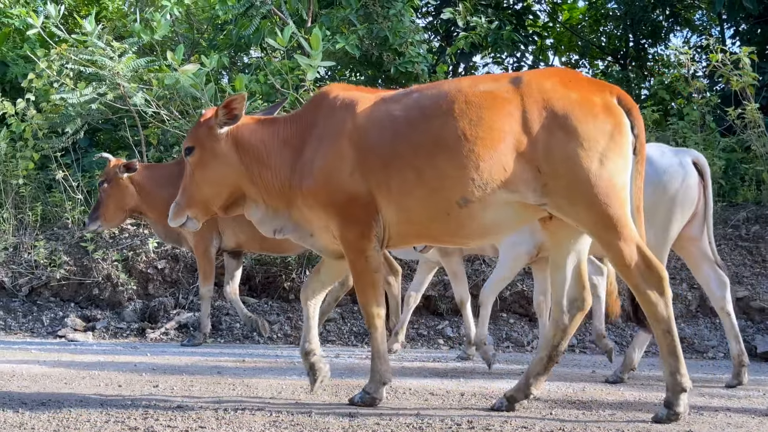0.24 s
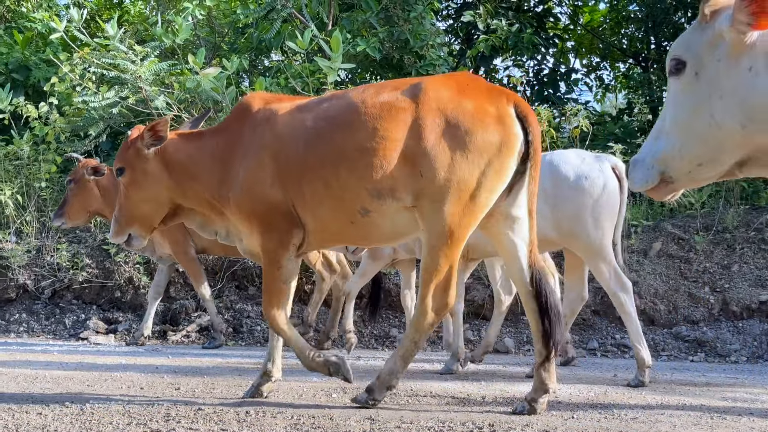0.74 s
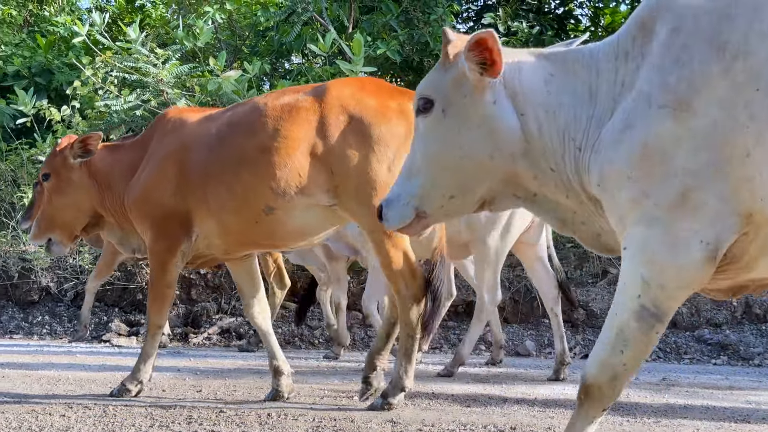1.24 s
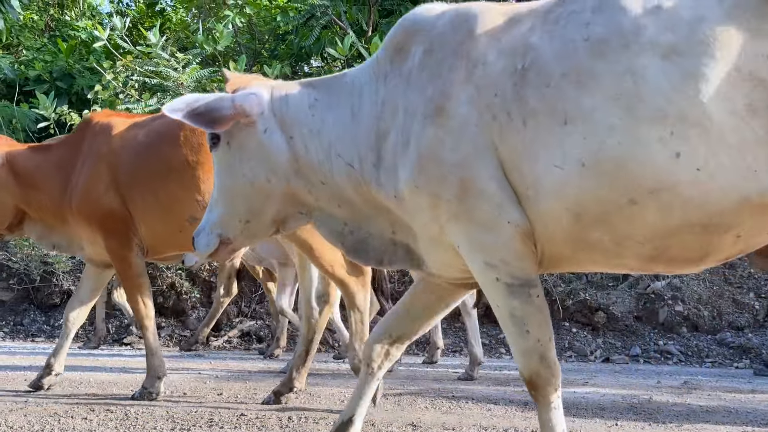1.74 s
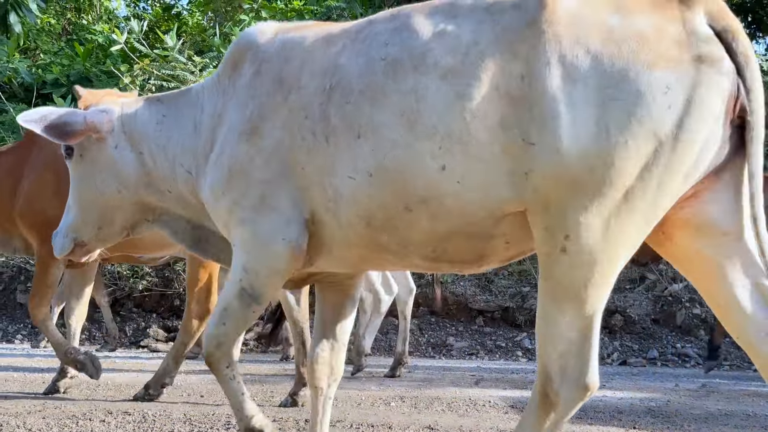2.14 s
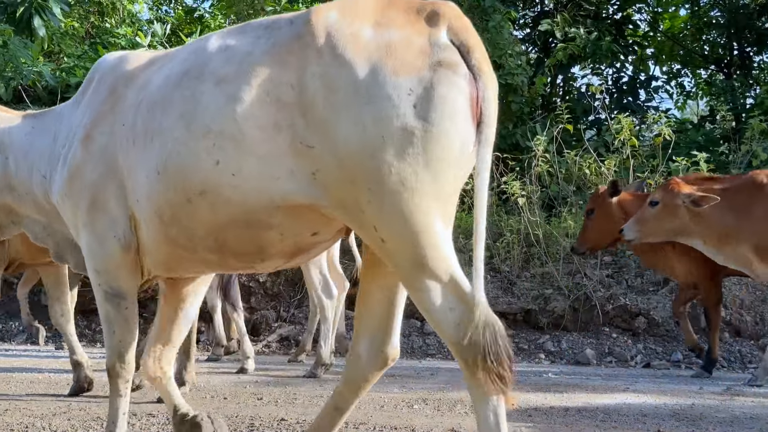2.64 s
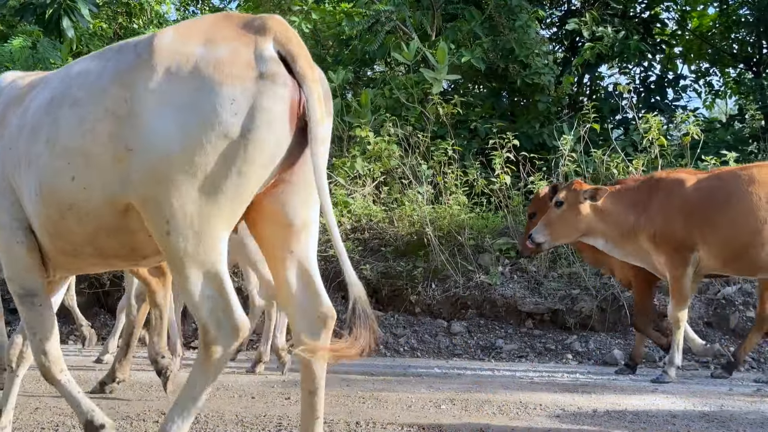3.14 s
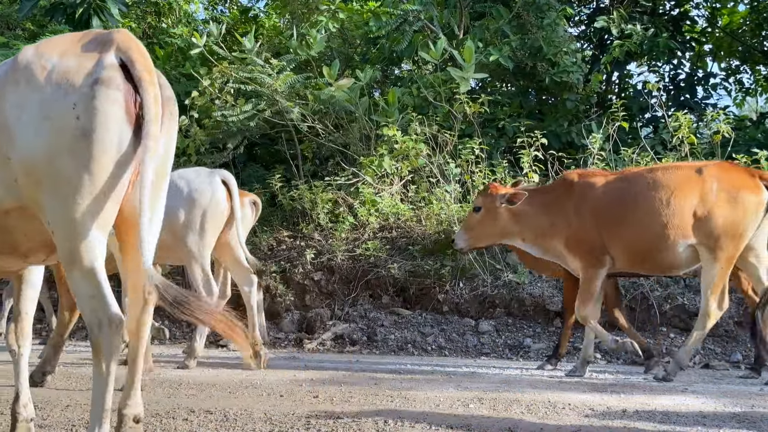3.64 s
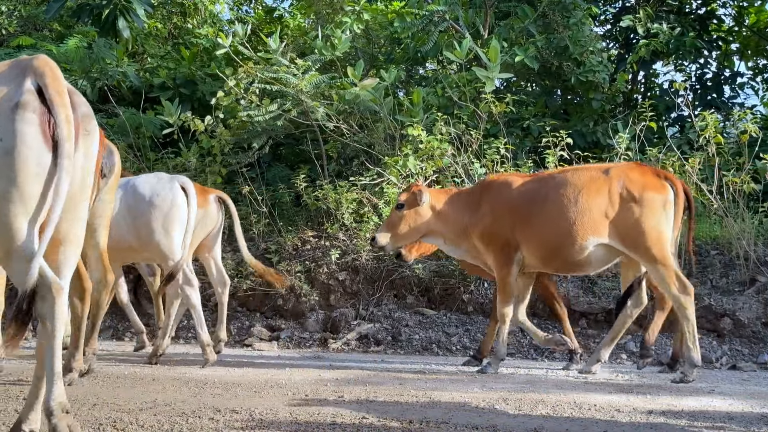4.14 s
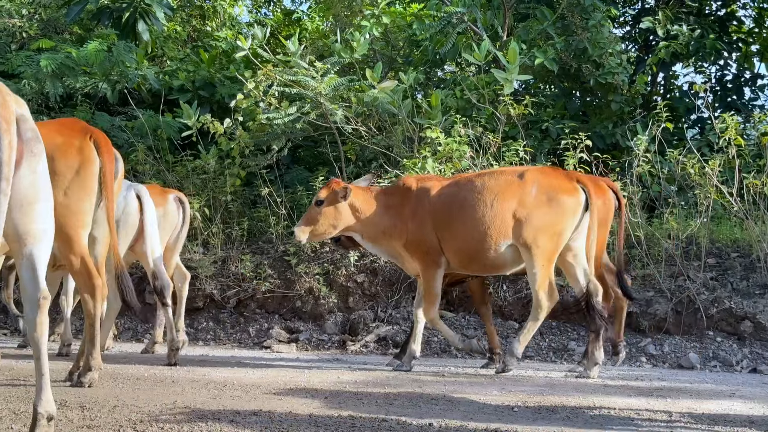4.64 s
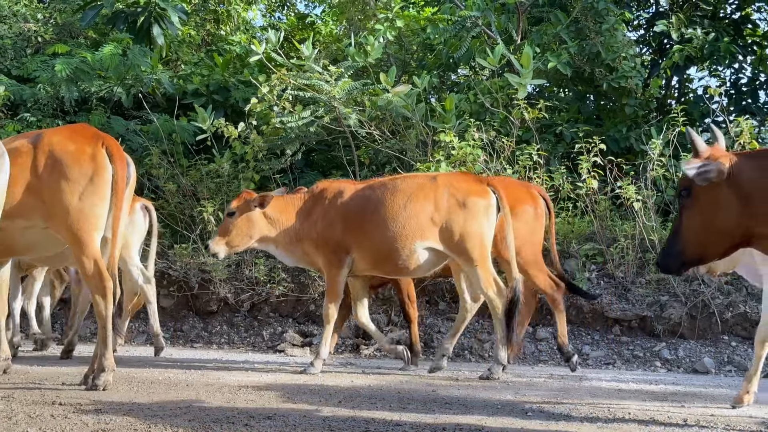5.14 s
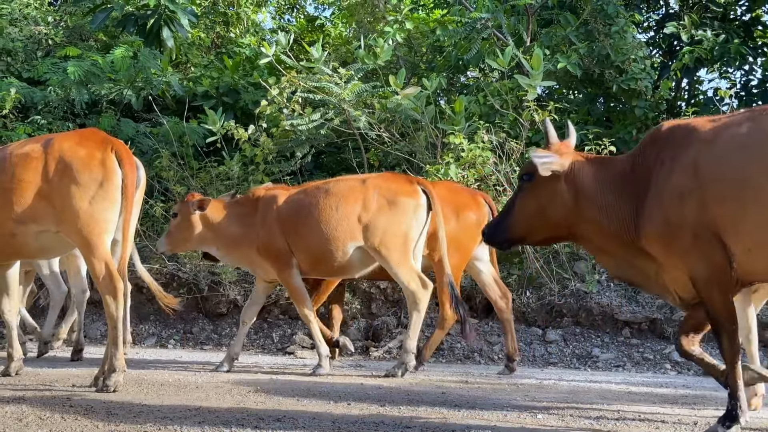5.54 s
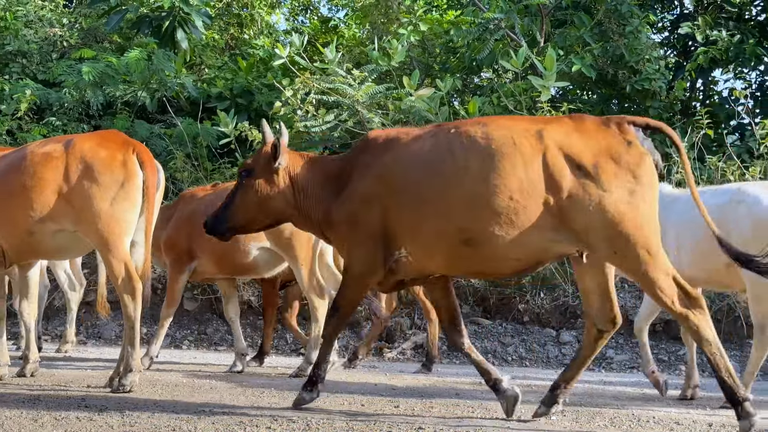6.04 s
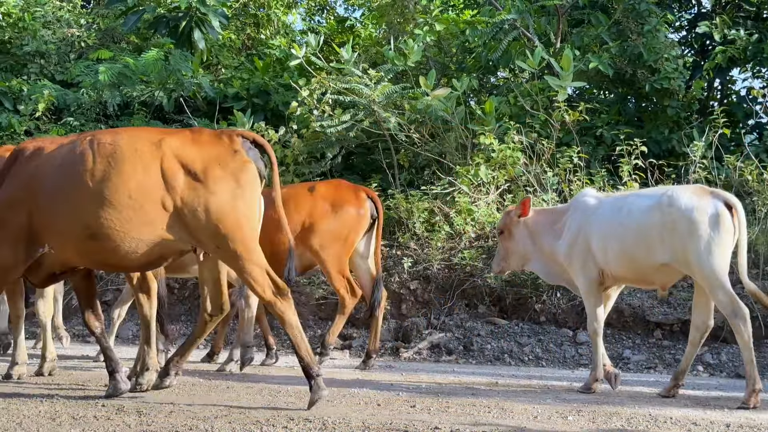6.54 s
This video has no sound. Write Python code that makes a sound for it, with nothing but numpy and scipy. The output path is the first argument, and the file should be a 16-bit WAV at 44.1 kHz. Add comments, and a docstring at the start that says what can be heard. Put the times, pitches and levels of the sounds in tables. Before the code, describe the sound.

Outdoors on a gravel road, a pair of close microphones hears hooves scuff and click quietly, then three cows low one after another near the right side. The first call swells loud and stops abruptly, the second is higher and softer, the third deep, rough and long. Wind buffets low, a brief rustle and thin insect tone slip between, over distant rumble and faint hiss.

```python
"""Three lowing calls on a gravel road

Three animals of a herd low in turn, close by on the right of a pair of microphones; each call rises, holds and falls.
Each closing of the vocal folds rings throat resonances that move with the mouth, mixed with a puff of breath.
Hooves click (short cracks of noise) and scuff (swells of uneven grains) on gravel, a noise band rustles,
an insect sings briefly in thin wavering tones, and lumpy low noise buffets the microphones over a far rumble and hiss."""
import sys
import numpy as np
from scipy import signal
from scipy.fft import rfft, irfft, next_fast_len
from scipy.io import wavfile
from scipy.ndimage import uniform_filter1d, map_coordinates

SR = 44100
rng = np.random.default_rng(int(sys.argv[2]) if len(sys.argv) > 2 else 0)


def wrap_up_sound(samples):
    """Save the sound to the file named by the first command line argument, as 16-bit audio."""
    columns = np.atleast_2d(samples).T
    # keep every value between -1 and 1, then stretch to whole-number steps
    tamed = np.clip(columns, -1, 1)
    steps = np.round(tamed * 32767).astype(np.int16)
    wavfile.write(sys.argv[1], SR, steps)


N = 299439
SPAN = 4096  # samples that each vocal pulse may ring


def amp(db):
    """Gain of a level in dB."""
    return 10 ** (np.asarray(db) / 20)


def unit(x):
    """x at rms 1."""
    return x / np.sqrt(np.mean(x ** 2) + 1e-20)


def along(points, hz):
    """A (f/Hz, value) table read at hz on a log frequency axis."""
    f, v = np.transpose(points)
    return np.interp(np.log(hz + 1), np.log(f + 1), v)


def curve(rows, x=None):
    """A (position, value) table read at x, or at the time of every sample."""
    return np.interp(np.arange(N) / SR if x is None else x, *np.transpose(rows))


def wobble(rate):
    """A smooth random curve, rate knots a second."""
    knots = rng.standard_normal(int(N * rate / SR) + 4)
    return map_coordinates(knots, [np.arange(N) * rate / SR])


def filtered(x, response):
    """x times a response of frequency."""
    m = next_fast_len(N + SR // 2)
    return irfft(rfft(x, m) * response(np.fft.rfftfreq(m, 1 / SR)), m)[..., :N]


def rush(spectrum, source=None):
    """Stereo noise of rms 1, partly shared by the two microphones as from a spread-out source."""
    # left-right likeness: f/Hz, correlation
    alike = [(40, 0.929), (130, 0.885), (640, 0.77), (3100, 0.92), (15000, 0.18)]
    pair = rng.standard_normal((2, N)) if source is None else source

    def mid_side(hz):
        turn = np.arccos(np.clip(along(alike, hz), -1, 1)) / 2
        return amp(along(spectrum, hz)) * [np.cos(turn), np.sin(turn)]

    mid, side = filtered(pair, mid_side)
    return unit(np.array([mid + side, mid - side]))


def far_air():
    """A steady far rumble and a hiss, both shaped noise."""
    # spectra of the rumble and the hiss: f/Hz, relative level/dB
    rumble = [(13, -40.5), (24, -16.5), (53, -0.5), (71, -23.5), (187, -15), (214, -25), (372, -32),
              (486, -30), (1200, -43.5), (1560, -70.5), (2640, -120)]
    hiss = [(410, -40.5), (700, -9.5), (1290, -12), (7120, -15), (8540, -16.5), (12600, -8), (15500, -19.5)]
    rumble_db, hiss_db = -64, -84
    return amp(rumble_db) * rush(rumble) + amp(hiss_db) * rush(hiss)


def buffeting():
    """Air pushing at the microphones is low noise in lumps, with stronger spells that rise and sink."""
    # course of the buffeting before its lumps: t/s, level/dB
    course = [(0, -68), (1.9, -69.5), (2.2, -63.5), (4.5, -63), (4.8, -65.5), (6.79, -63)]
    # stronger spells before the lumps: peak t/s, level/dB, time to rise 20 dB/s
    spells = [(2.4, -44, 0.29), (3.3, -60.5, 0.5), (3.57, -45, 0.2258), (5.199, -64, 1.12),
              (5.501, -37.5, 0.1115)]
    # spectrum of the buffeting: f/Hz, relative level/dB
    gust_spectrum = [(25, -49), (40, -9), (60, -0.5), (110, -4), (200, -14.5), (400, -22.5), (800, -48.5),
                     (1600, -120)]
    fall_s = 0.25  # time to sink 20 dB
    t = np.arange(N) / SR
    gusts = sum(amp(db - 20 * np.maximum((s - t) / rise, (t - s) / fall_s)) for s, db, rise in spells)
    lumps = amp(3.6 * wobble(14))
    return (amp(curve(course)) + gusts) * lumps * rush(gust_spectrum)


def air_puffs():
    """A single puff of air swings both microphones alike, a few low cycles that soon die."""
    # puffs: start t/s, level before an 11 dB lift and the swing's envelope/dB, f/Hz
    thumps = [(2.529, -29.5, 115.6), (3.229, -27.5, 59.52), (3.254, -24.5, 58), (3.476, -32.5, 129.9),
              (3.486, -31.5, 80), (3.494, -30, 75.4), (3.513, -34, 80)]
    out = np.zeros((2, N))
    for s, db, hz in thumps:
        cycles = np.arange(SR // 10) / SR * hz
        swing = np.sin(2 * np.pi * cycles) * cycles * np.exp(-1.8 * cycles)
        first = round(s * SR)
        out[:, first:first + len(cycles)] -= amp(db + 11.0) * swing
    return out


def far_gravel():
    """Gravel under the whole herd is noise with a slow and a quick flutter."""
    # course before the flutter: t/s, level/dB
    course = [(0, -86.5), (1.9, -81), (2.9, -71.5), (4.6, -71), (5.4, -71), (6.5, -65.5), (6.79, -71.5)]
    # spectrum of the gravel: f/Hz, relative level/dB
    gravel = [(410, -42), (700, -4), (1700, -8), (4200, -7.5), (7400, -9), (10000, -15.5), (13000, -22.5),
              (15500, -32)]
    return amp(curve(course) + 2.1 * wobble(18) + 0.92 * wobble(300)) * rush(gravel)


def near_scuffs():
    """A hoof dragged through gravel is a swell of many grains of uneven size."""
    # drags: start t/s, level before a 4 dB cut and the swell's shape/dB
    drags = [(0.047, -59.5), (0.24, -56), (0.507, -58), (0.569, -54.5), (0.784, -53.5), (0.847, -56),
             (1.114, -56), (1.198, -57), (1.333, -45.5), (1.458, -50.5), (1.555, -61), (1.68, -56),
             (1.917, -51.5), (3.98, -43), (4.8933, -52), (5.6375, -34), (5.715, -42), (6.0552, -41.5)]
    # spectrum of a near scuff: f/Hz, relative level/dB
    grit = [(410, -42.5), (900, -18.5), (2000, -6.5), (4200, -9), (7400, -6), (10000, -9.5), (13000, -21),
            (15500, -24.5)]
    swell_s = 0.05  # time scale of one drag
    swells = 0
    for s, db in drags:
        u = np.maximum(np.arange(N) / SR - s, 0) / swell_s
        swells = swells + amp(db - 4.0) * u * np.exp(-3 * u ** 2)
    grains = rng.standard_normal((2, N)) * amp(1.5 * wobble(40) + 4 * wobble(500))
    return swells * rush(grit, grains)


def hoof_clicks():
    """A hoof striking stone is a decaying crack of noise in the stone's colour, plus its bright edge."""
    # strikes: t/s, level before a 9 dB lift and the stone's colour/dB, gain of the bright edge/dB
    strikes = [(0.637, -68.5, -9), (0.6825, -57, -30.5), (0.708, -54, -22), (0.7285, -59, -29.5),
               (1.3512, -64.5, -24), (1.53, -58, -17.5), (1.614, -58, -35), (1.66, -58.5, -34),
               (1.7453, -43.5, -35), (1.7757, -54.5, -27.5), (1.8334, -55, -26), (2.98, -54.5, -17),
               (3.2182, -62, -5.5), (3.297, -57.5, -15), (3.456, -52.5, -15.5), (4.7300, -48, -26.5)]
    # colour of the stone: f/Hz, level/dB (held at -40 dB or above)
    stone = [(290, -61), (500, -57), (2070, 1.5), (3240, -10), (4190, -4.5), (5670, -19.5), (9790, -15),
             (15500, -38)]
    t = np.arange(1000) / SR
    cracks, sparks = np.zeros((2, N))
    for s, db, treble_db in strikes:
        crack = amp(db + 9.0 - 60 * t / 0.012) * rng.standard_normal(len(t))  # 60 dB down in 12 ms
        first = round(s * SR)
        cracks[first:first + len(t)] += crack
        edge = crack[2:] - crack[:-2]  # a difference two samples apart
        sparks[first + 2:first + len(t)] += amp(treble_db) * edge
    grid = np.linspace(0, 1, 128)
    colour_db = np.maximum(along(stone, grid * SR / 2), -40)
    # twice the dB, since the minimum-phase step takes the square root of the response
    colour = signal.minimum_phase(signal.firwin2(255, grid, amp(2 * colour_db)))
    return signal.lfilter(colour, 1, cracks) + sparks


def rustle():
    """Short bursts of noise in one broad band, sudden to start, slower to sink."""
    # bursts: start t/s, level before the flutter/dB, time to sink 10 dB/s
    bursts = [(4.726, -41, 0.0408), (5.24, -64, 0.02), (5.343, -59.5, 0.22), (5.47, -56.5, 0.42)]
    centre_hz, wide_hz = 4650, 1600
    t = np.arange(N) / SR
    level = 0
    for s, db, fall in bursts:
        onset = np.clip((t - s) / 0.0059, 0, 1)
        level = level + amp(db - 10 * np.maximum(t - s, 0) / fall) * onset
    noise = rng.standard_normal((2, N))
    band = filtered(noise, lambda f: np.exp(-((f - centre_hz) / wide_hz) ** 2))
    return level * amp(2.0 * wobble(150)) * unit(band)


def insects():
    """Thin tones of unsteady pitch that fade in and out."""
    # songs: start t/s, end t/s, f/Hz, waver/Hz, rms level between the fades/dB
    songs = [(1.656, 1.937, 3348, 6, -82), (4.321, 4.566, 6780, 230, -68.5)]
    out = 0
    for s0, s1, hz, width, db in songs:
        phase = 2 * np.pi * np.cumsum(hz + width * wobble(600)) / SR
        fade = curve([(s0, 0), (s0 + 0.036, 1), (s1 - .02, 1), (s1, 0)])
        out = out + amp(db) * fade * np.sqrt(2) * np.sin(phase)
    return out


def roughness(at, pitch, clean, slack):
    """Slack folds run rougher with the square of the drop under the top pitch, and in hoarse spells."""
    # spells where the voice breaks up: start t/s, end t/s, added roughness,
    # level that every other pulse gains and the next loses/dB
    hoarse = [(3.2, 3.5, .6, 0), (3.57, 3.77, .14, 0), (4.33, 4.66, .15, 0), (5.38, 5.58, .15, 2.5),
              (5.62, 5.98, .33, 1), (5.95, 6.7, .05, .7)]
    fade_s = .06
    spells, uneven_db = sum(
        np.outer(added, np.clip(np.minimum(at - s0, s1 - at) / fade_s, 0, 1)) for s0, s1, *added in hoarse)
    rough = clean + slack * (1 - pitch / pitch.max()) ** 2 + spells
    return np.clip(rough, 0, 1), uneven_db


def throat_ring(f, at, rough, shape, tongue, throat, nose):
    """Resonances of the throat at each pulse, moved by mouth and tongue; the nose swallows narrow bands."""
    hum = 0.44  # dB that the lowest resonance gains for each dB the upper ones lose
    when, opening, lips = np.transpose(shape)
    mouth = np.clip(np.interp(at, when, opening), 0, 1)[:, None]
    lips_db = np.interp(at, when, lips)[:, None]
    ring = 0
    for k, (hz0, hz1, narrow, db0, db1) in enumerate(throat):
        width = narrow * (1 + rough[:, None])  # folds that close badly damp the throat
        waver = uniform_filter1d(rng.standard_normal((len(at), 2)), size=15, axis=0)  # soft walls never hold still
        hz = hz0 + (hz1 - hz0) * mouth
        if k == 4:  # the tongue moves the fifth resonance
            hz = hz + curve(tongue, at)[:, None]
        hz = hz * (1 + .03 * waver[:, :1])
        db = db0 + (db1 - db0) * mouth + 6.12 * waver[:, 1:]
        if k == 0:
            db = db - hum * np.minimum(lips_db, 0)
        if k > 1:
            db = db + lips_db
        soak = 1 / (1 + 1j * f / (2 * hz)) ** 2  # the walls soak up what lies far above each resonance
        band = 1j * f * width / (hz * hz - f * f + 1j * f * width)
        ring = ring + (-1) ** k * amp(db) * band * soak
    for hz, width, db in nose:
        gap = hz * hz - f * f
        ring = ring * (gap + 1j * f * width * amp(db)) / (gap + 1j * f * width)
    return ring


def breathy_folds(f, period, rough, breath_db):
    """A puff of breath lasts about one cycle; it gains on the pulse in the treble and in rough voice."""
    age = np.arange(SPAN // 4) / SR / period[:, None]  # in cycles
    puffs = rng.standard_normal((2, *age.shape)) * np.exp(-.4 * age) * (age < 1.2)
    puff, other = rfft(puffs / np.linalg.norm(puffs, axis=2, keepdims=True), SPAN)
    breath = amp(breath_db) * (f / 3000) ** 2
    share = np.clip(1.1 * rough[:, None] * (f / 600) ** .6 + breath, 0, 1)
    apart = np.clip(f / 7000, 0, 1)  # the shaded left side hears treble breath scattered by another path
    puffs = np.array([np.sqrt(1 - apart ** 2) * puff + apart * other, puff])
    return np.sqrt(1 - share ** 2) + share * puffs


def echoes():
    """The road and the flanks of the herd answer within hundredths of a second, differently left and right."""
    tail = rng.standard_normal((2, SPAN // 2)) * amp(-60 * np.arange(SPAN // 2) / SR / .04)  # 60 dB down in 40 ms
    return 1 + amp(-14) * rfft(tail / np.linalg.norm(tail[0]), SPAN)


def low(call, shape, tongue, cords, throat, nose, lead, breath_db):
    """Each closing of the vocal folds, with its puff of breath, rings the throat as shaped at that moment."""
    # the body between the microphones shades the left one: f/Hz, left-right level/dB
    shade_db = [(60, 1), (180, -5), (550, -6.5), (1650, -13), (4970, -14.5), (15000, -9)]
    spread_s_per_hz = 5e-7  # the treble of each pulse leaves a little later
    s, pitch, level = np.transpose(call)
    t = np.arange(s[0], s[-1], 1 / SR)
    cycles = np.cumsum(uniform_filter1d(np.interp(t, s, pitch), size=1500)) / SR
    at = np.interp(np.arange(1, int(cycles[-1]) + 1), cycles, t)  # one closing a cycle
    period = 1 / np.interp(at, s, pitch)
    rough, uneven_db = roughness(at, 1 / period, *cords)
    # neighbouring cycles err alike, in time and in level
    luck = 1.188 * uniform_filter1d(rng.standard_normal((len(at), 2)), size=2, axis=0)
    at = at + .12 * rough * period * luck[:, 0]

    f = np.fft.rfftfreq(SPAN, 1 / SR) + 1e-3
    ring = throat_ring(f, at, rough, shape, tongue, throat, nose)
    folds = breathy_folds(f, period, rough, breath_db)
    energy = np.sqrt(np.mean(abs(ring) ** 2, 1).mean() / (period * SR))
    pulse_db = np.interp(at, s, level) + 3 * rough * luck[:, 1] + uneven_db * (-1) ** np.arange(len(at))
    size = amp(pulse_db) / energy

    start = np.floor(at * SR).astype(int) - 64  # room ahead of each pulse
    delay = (at - start / SR)[:, None] + spread_s_per_hz * f / 2
    ring = ring * size[:, None] * np.exp(-2j * np.pi * f * delay)
    shade = amp(along(shade_db, f)) * np.exp(1j * curve(lead, f))
    echo = echoes()
    where = (start[:, None] + np.arange(SPAN)).ravel()
    sides = []
    for path in (shade * echo[0] * folds[0], echo[1] * folds[1]):
        pulses = irfft(1.393 * ring * path, SPAN)
        sides.append(np.bincount(where, pulses.ravel(), N + SPAN)[:N])
    return np.array(sides) * np.clip((s[-1] - np.arange(N) / SR) / .002, 0, 1)  # 2 ms fade at the end


def herd():
    """Three voices, each with its own throat, nose and folds, calling in turn."""
    # calls: t/s, pitch f/Hz, level before a fixed gain and the cycles' errors/dB
    first_call = [(1.965, 121.9, -46), (1.991, 129.2, -35), (2.025, 134.6, -39), (2.044, 137.1, -30),
                  (2.24, 157.1, -27), (2.491, 173, -21), (2.648, 165.4, -18.5), (2.792, 144.1, -15),
                  (2.842, 128.4, -15.5), (2.916, 96.35, -20.5)]
    second_call = [(3.38, 79.53, -75.5), (3.465, 94.79, -61), (3.49, 101.3, -48.5), (3.525, 104.8, -50.5),
                   (3.555, 123.9, -43), (3.594, 146.9, -39), (3.694, 183.1, -33), (3.754, 207.5, -32.5),
                   (3.82, 211.4, -32), (4.05, 211.6, -29), (4.19, 205.7, -29), (4.259, 195.7, -30),
                   (4.45, 146.6, -36), (4.53, 111.4, -39.5), (4.599, 93.6, -68)]
    third_call = [(5.43, 76.21, -66), (5.469, 84.49, -37.5), (5.554, 105.9, -29.5), (5.616, 138.7, -21.5),
                  (5.68, 152.9, -21), (5.791, 164, -21), (5.938, 162.2, -22), (6.24, 157.7, -19),
                  (6.33, 149, -17.5), (6.41, 134.6, -17), (6.498, 119.2, -17), (6.63, 77.96, -24),
                  (6.725, 59.96, -43)]
    # mouth in each call: t/s, opening (0-1), level of the third and higher resonances/dB
    mouths = [
        [(2.0, .1, -15), (2.04, 0.21, 5), (2.45, 0.94, 2), (2.78, 0.86, -1), (2.92, 0.44, -6)],
        [(3.4, 0, 11), (3.52, 0, 6), (3.54, 0, 11.5), (3.64, .15, 5), (3.7, 0.31, 1), (3.77, 0.8, 3.5),
         (4.25, 0.58, -3), (4.45, 0.5, 4), (4.59, 0, -7.5)],
        [(5.45, 0, -4), (5.54, 0, -5), (5.565, 0, -15), (5.612, 0.12, -25.5), (5.63, 0.4, -8),
         (5.655, .35, -6.5), (5.668, 0.38, 1), (5.8, 0.46, 2), (5.87, 0.52, 0.5), (5.97, 0.98, 0.5),
         (6.25, 0.9, 1.5), (6.4, 0.65, -4.5), (6.6, 0.45, 1.05), (6.72, 0.42, -16.5)],
    ]
    # tongue in each call: t/s, shift of the fifth resonance f/Hz
    tongues = [
        [(2, 0.0014)],
        [(3.4, 0)],
        [(5.7, -130), (5.93, -290), (6.065, -290), (6.12, 8.5), (6.3, -41), (6.46, -180), (6.7, -150)],
    ]
    # folds of each voice: roughness at the top pitch (0-1), added roughness as the pitch sinks to nothing
    cords = [(.04, .3), (.04, .75), (.08, .5)]
    # throat resonances before the walls waver: f narrow mouth/Hz, f open mouth/Hz,
    # width in clean voice/Hz, level narrow/dB, level open/dB
    throats = [
        [(150.7, 205, 130, -23, -35.5), (435.25, 513, 19.97, 4.5, 1.5), (1274.6, 1263, 52.35, -2, -3.5),
         (2023.6, 2066.6, 82.9, -4.5, -2), (2270, 2346.5, 156, -6, -5.5), (3068, 3160, 117, -10.5, -10.5),
         (3597, 3694, 46, -12.5, -14.5), (4071, 4140, 110, -14.5, -20), (5120, 4780, 600, -20.5, -34.5),
         (10400, 8950, 1500, -42, -45), (14026, 52000, 1100, -50, -48.5)],
        [(187, 364, 230, -23.5, -10), (361.3, 408.5, 26.5, 10.5, 1), (926.6, 838.1, 67.8, 2, -0.5),
         (1904, 1467, 117.6, -11.5, -1), (2629.3, 2626, 110, -12, -17.5), (3040, 2940, 110, -20, -19.5),
         (3346, 3400, 400, -29.5, -33), (6680, 2000, 4000, -44, -44), (13490, 38000, 690, -47.5, -45)],
        [(137, 198.3, 74, -16, -16.5), (258.1, 290.3, 27.45, -8, 8.5), (696.5, 647.8, 47.4, 4.5, -4),
         (1105.3, 980.3, 55.3, -12, -5), (1401.7, 1422, 57.3, -9.5, -5), (1720, 1950, 182.6, -10.5, -24),
         (2288, 2453, 177.6, -16.5, -29.5), (4600, 4200, 1400, -57, -51.5), (10140, 10020, 370, -48.5, -51.5)],
    ]
    # the nose as a side branch swallows narrow bands: f/Hz, width/Hz, depth/dB
    noses = [
        [(290.1, 100, -17), (2937, 210, -27.5)],
        [(519, 346, -6.5), (1267, 180, -16.5)],
        [(425.5, 230, -10), (3250, 400, -15.5)],
    ]
    # phase by which the left leads: f/Hz, phase/rad
    leads = [
        [(0, 0.446), (1400, 1.14), (2400, -2.5), (3300, -0.8), (5300, -3)],
        [(0, -0.5), (1700, -0.5), (2330, 5), (3360, 0.8), (5000, 2.5)],
        [(0, 0), (1290, 1.3825), (1550, 7.5), (2000, 1.5), (5000, 13)],
    ]
    breaths_db = (-24, -22, -16)  # breath share of clean voice at 3 kHz
    calls = (first_call, second_call, third_call)
    voices = zip(calls, mouths, tongues, cords, throats, noses, leads, breaths_db)
    return sum(low(*voice) for voice in voices)


def scene():
    """All sources at the two microphones, from the far air to the close calls."""
    air = far_air() + buffeting() + air_puffs()
    hooves = far_gravel() + near_scuffs() + hoof_clicks()
    return air + hooves + rustle() + insects() + herd()


def record(dry):
    """The whole scene is low-passed: nothing sounds above top_hz."""
    top_hz = 15700
    return filtered(dry, lambda hz: hz < top_hz)


dry = scene()
out = record(dry)
wrap_up_sound(out)
```